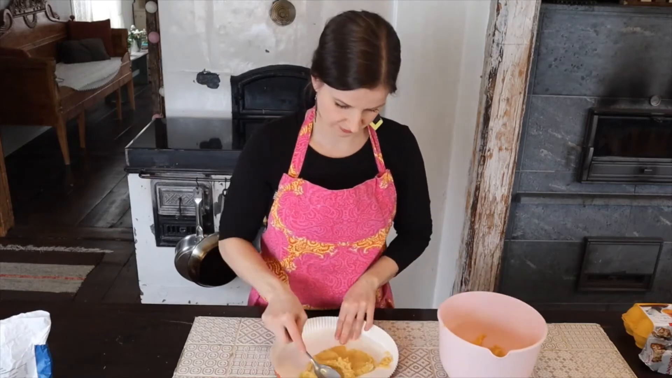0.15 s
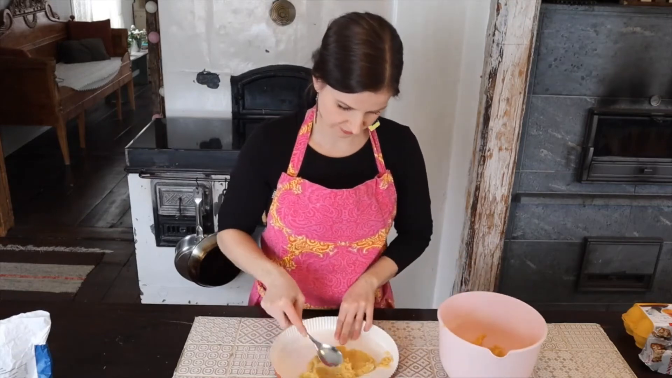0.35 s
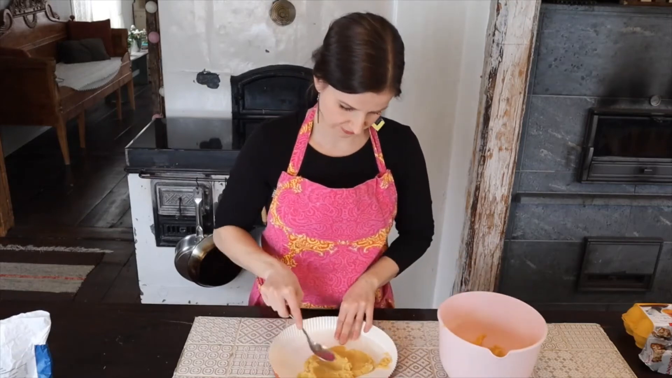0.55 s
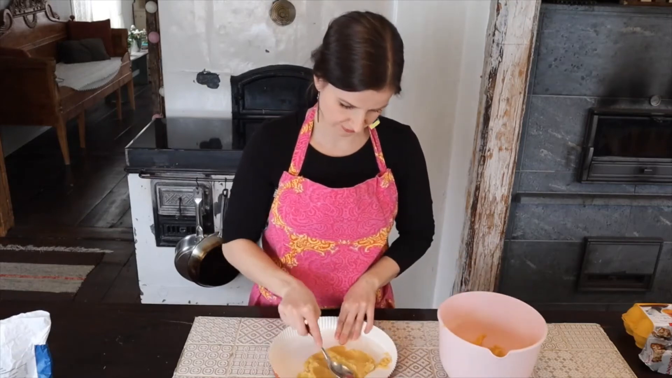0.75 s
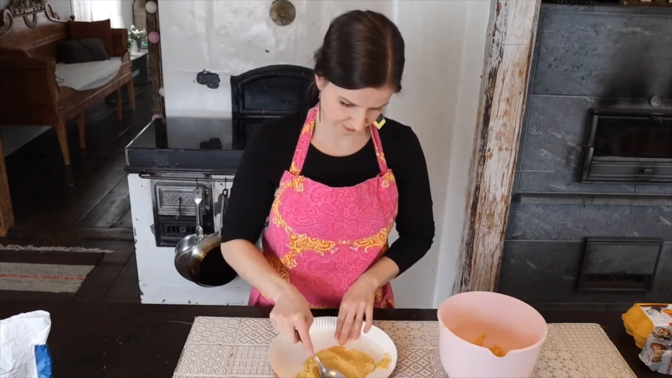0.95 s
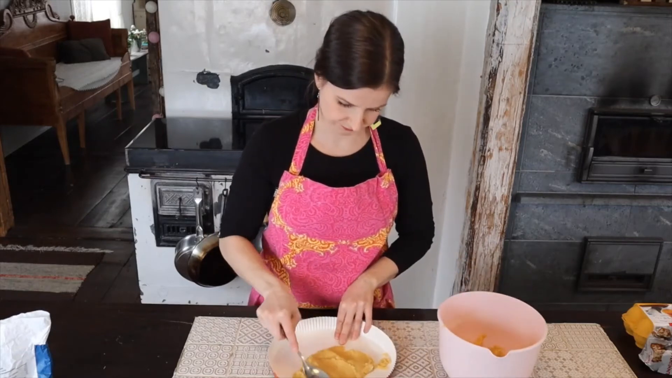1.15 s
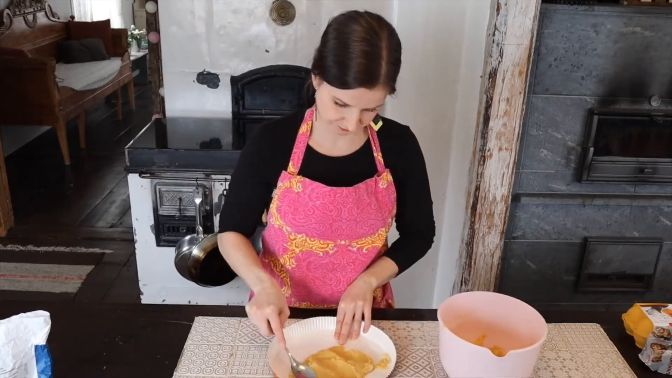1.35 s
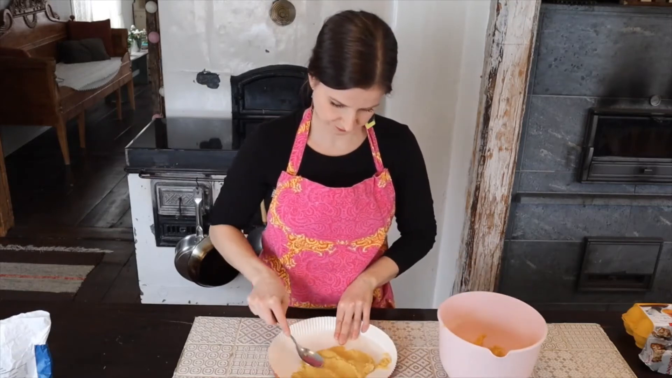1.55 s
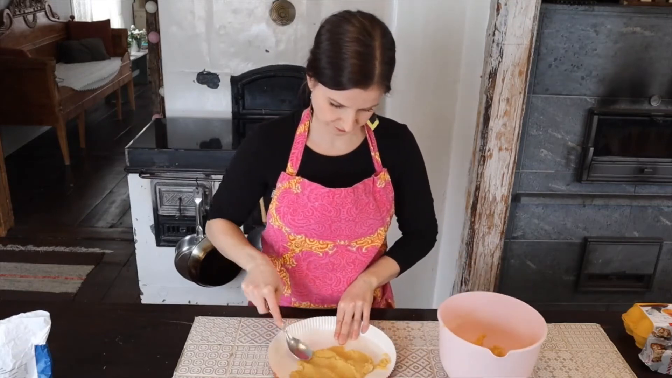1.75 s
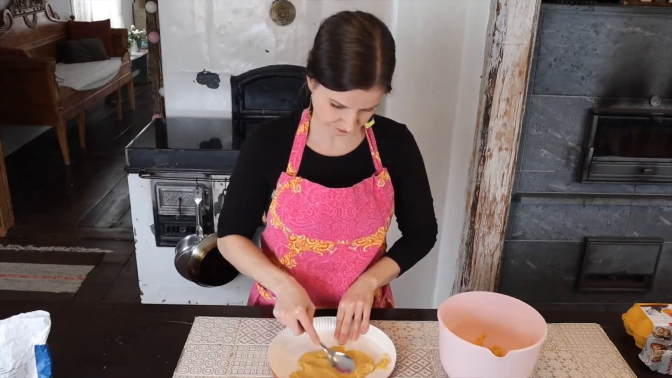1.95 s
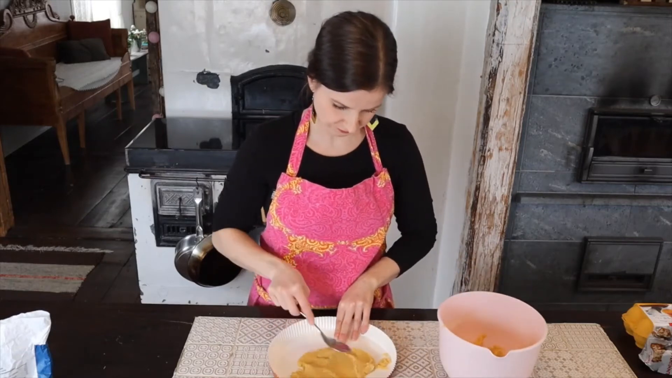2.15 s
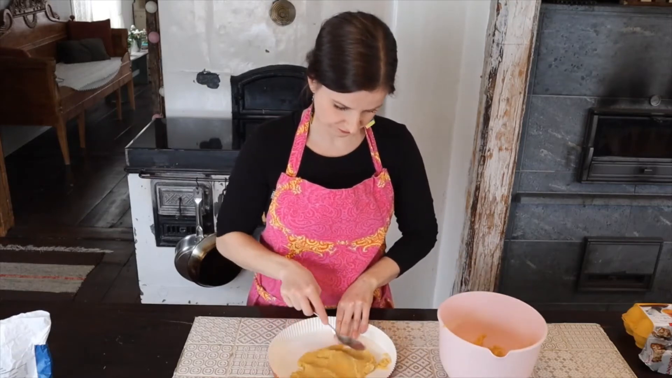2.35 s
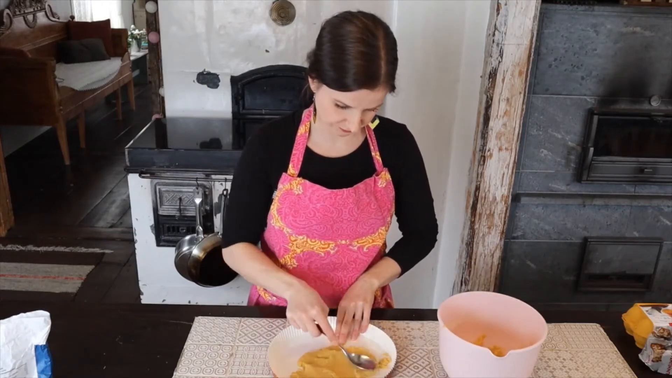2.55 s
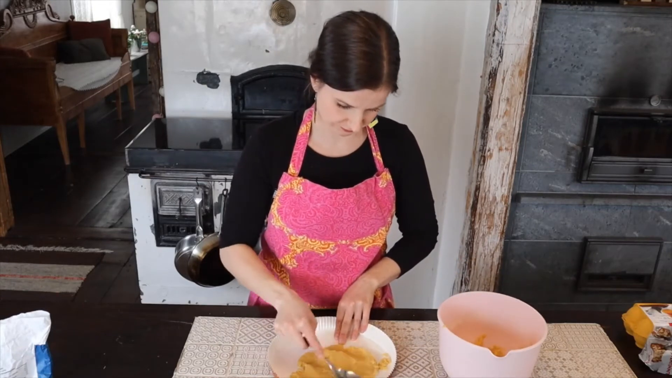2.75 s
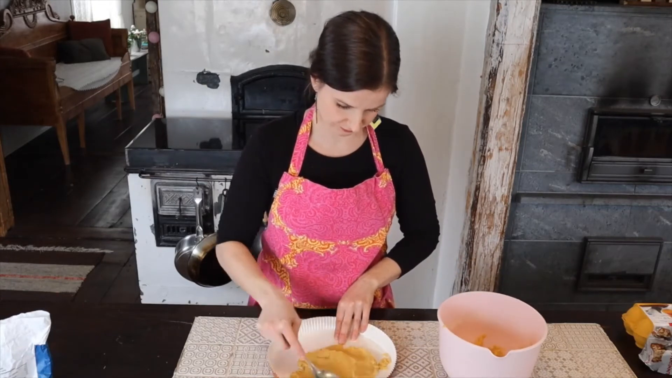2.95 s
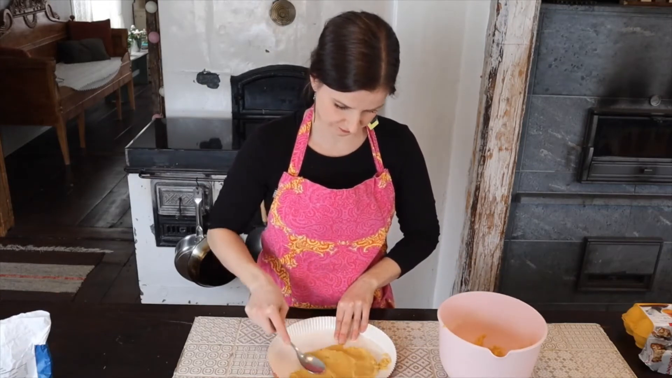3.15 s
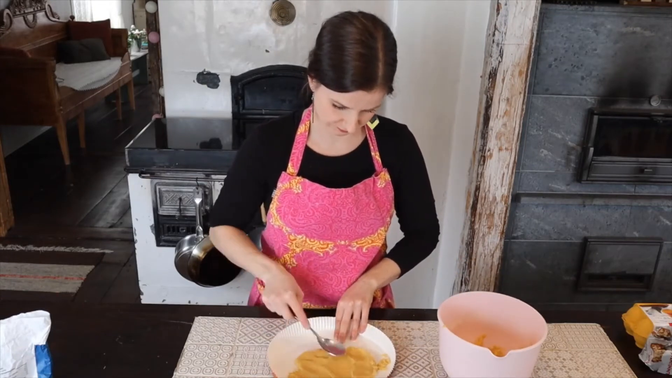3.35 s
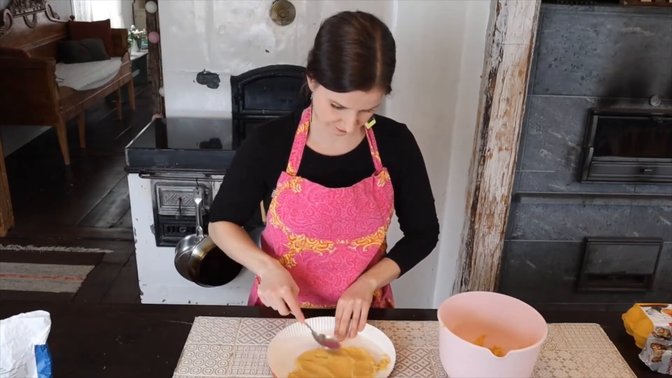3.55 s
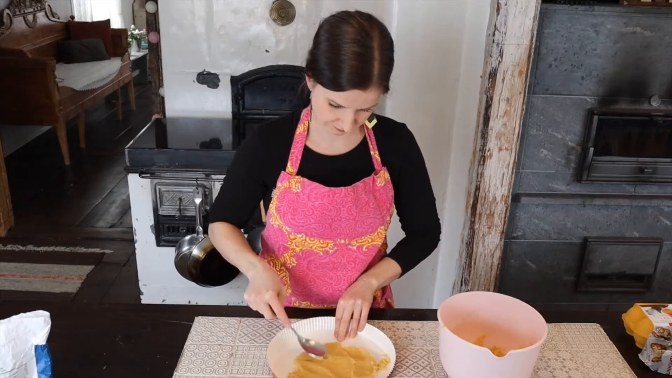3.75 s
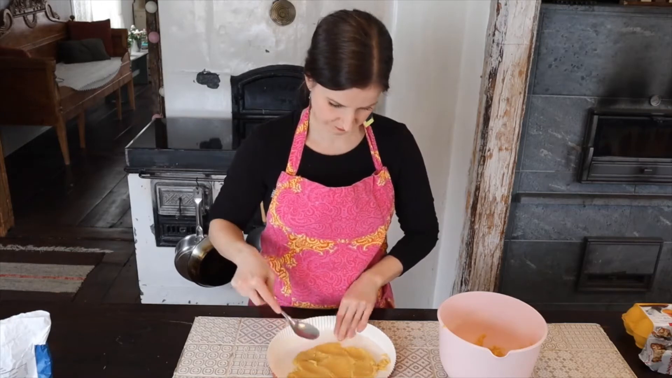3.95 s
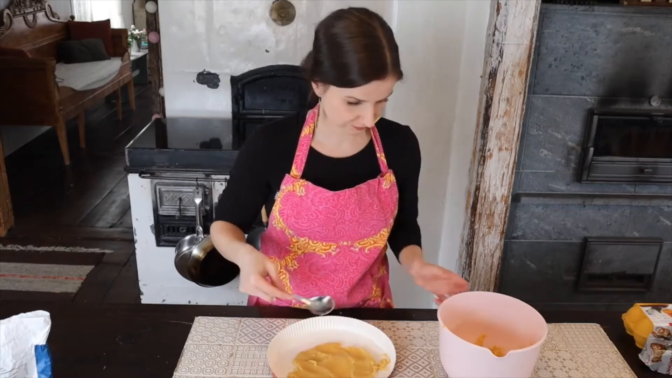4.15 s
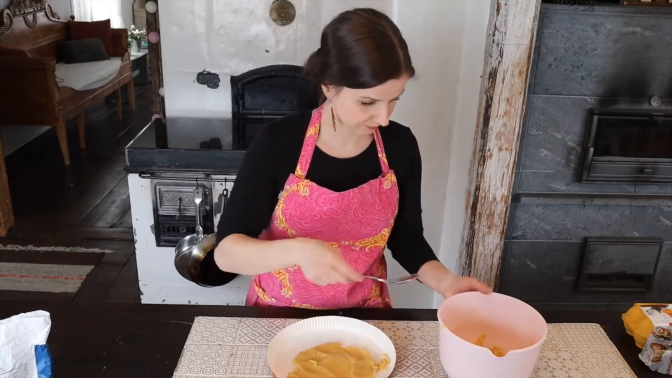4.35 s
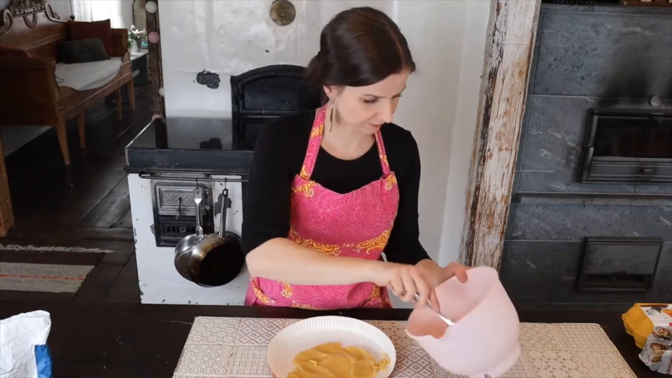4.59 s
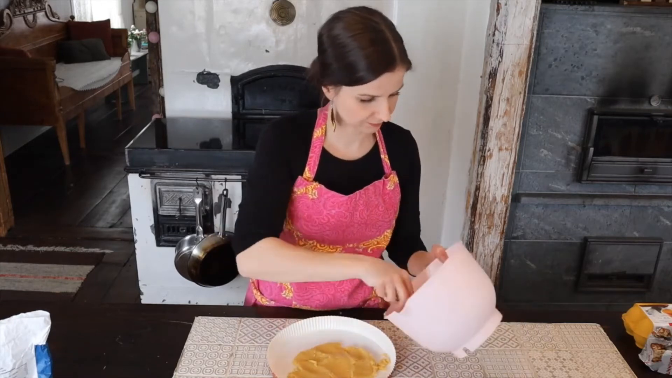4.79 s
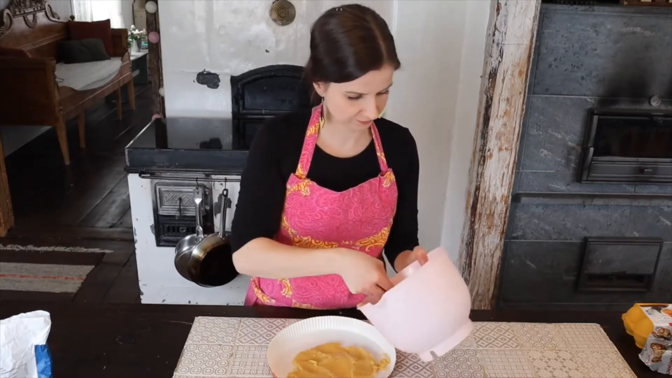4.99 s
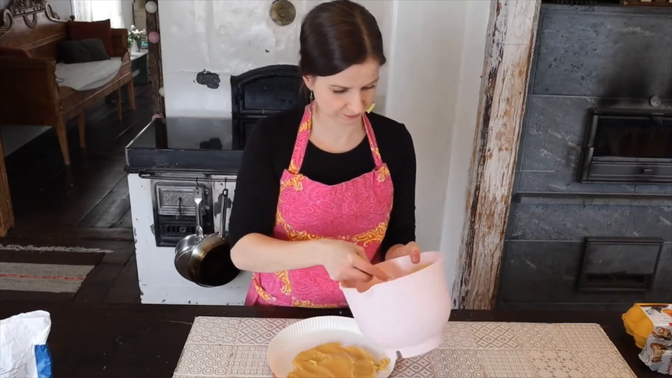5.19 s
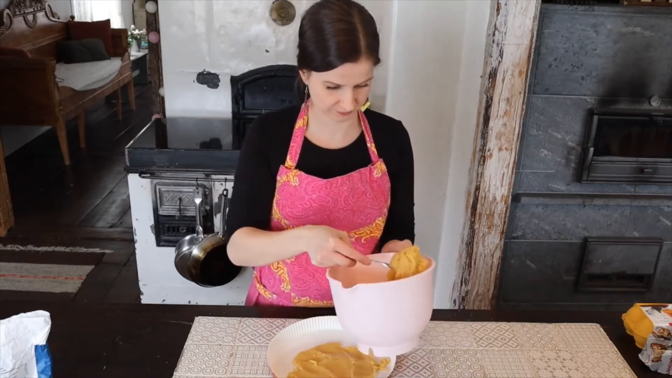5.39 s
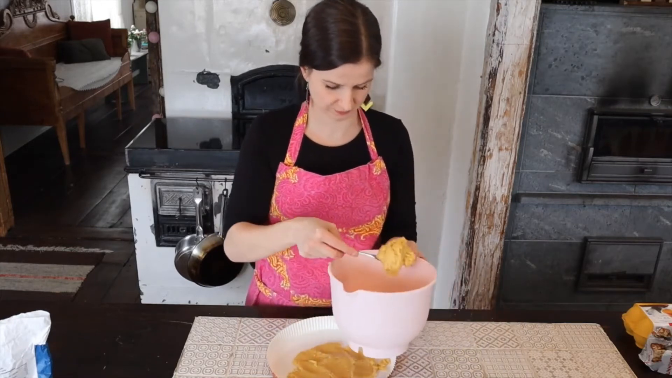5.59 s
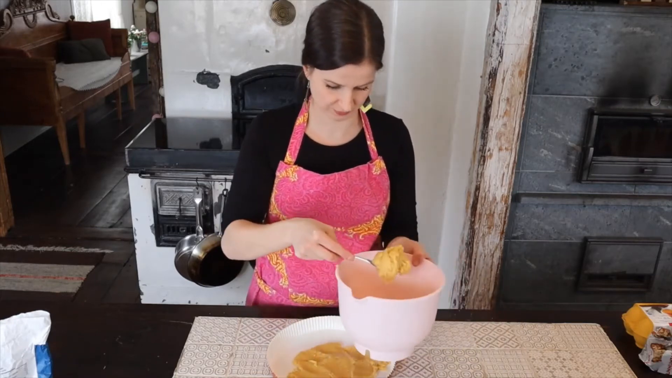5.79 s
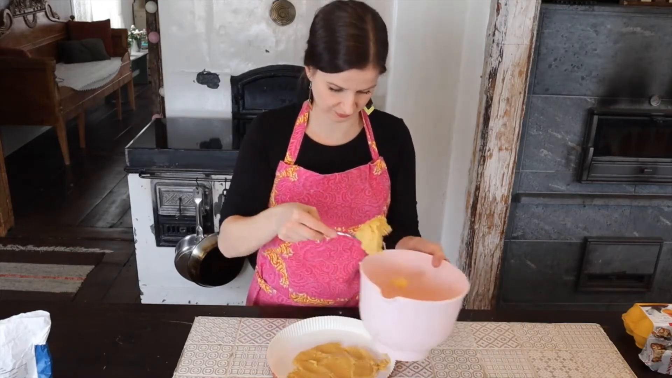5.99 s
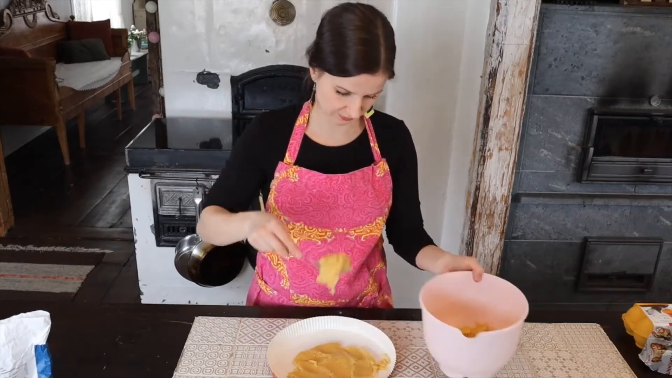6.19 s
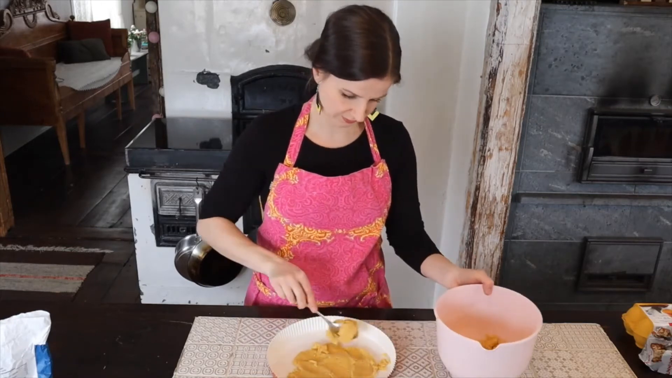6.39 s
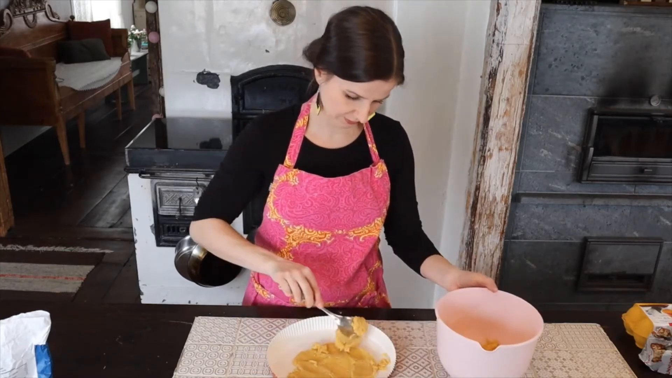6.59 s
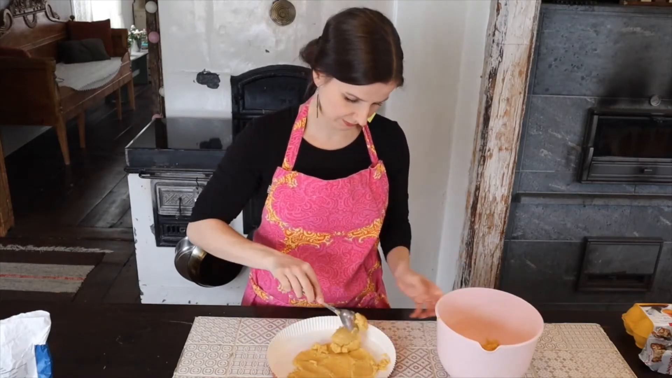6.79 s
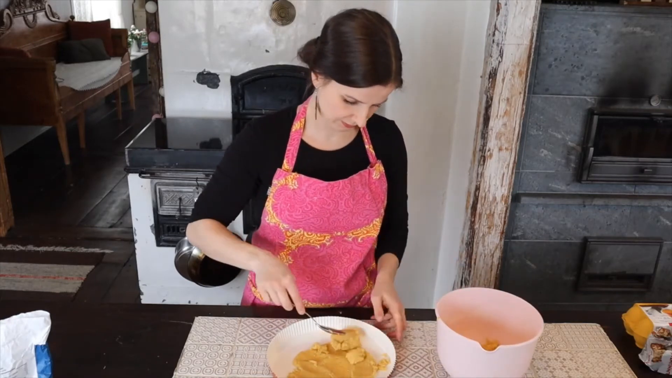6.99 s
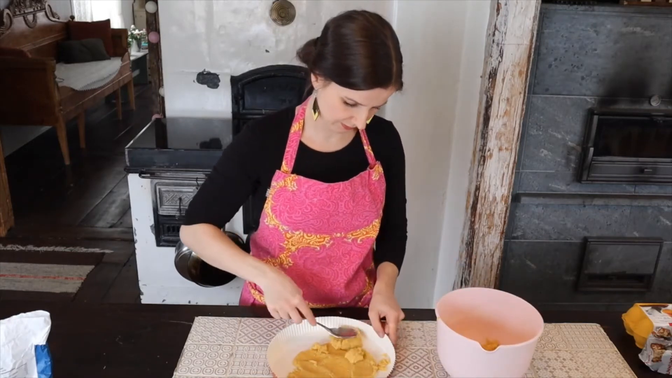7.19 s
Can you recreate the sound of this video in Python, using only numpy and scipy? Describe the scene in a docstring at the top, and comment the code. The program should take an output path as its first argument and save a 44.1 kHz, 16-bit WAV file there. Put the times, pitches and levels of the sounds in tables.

```python
"""A spoon spreads dough in a ceramic dish on a kitchen table: stick-slip noise and short blows excite the glaze
contact and the modes of dish, table and spoon, and hiss is heard as the metal smacks free of the dough.
A plastic bowl is touched, dragged up off the cloth, then set down and slid: rasp, rim, wall and boom.
A small hard room adds a dense reverberant tail with decay times below 0.3 s, and filtered noise with a low hum
makes a faint room tone; the mid-side stereo pair is widest in the treble."""
import sys
import numpy as np
from scipy import signal
from scipy.fft import rfft, irfft
from scipy.io import wavfile
from scipy.ndimage import uniform_filter1d

SR = 44100
rng = np.random.default_rng(int(sys.argv[2]) if len(sys.argv) > 2 else 0)


def rack_gain(trim_db):
    """Turn a fader trim in dB into the linear factor to multiply a signal by."""
    fader = np.asarray(trim_db, float)
    return 10 ** (fader / 20)


def store_wav(level_fs):
    """Save 16-bit WAV to argv[1]."""
    pcm = np.round(np.clip(np.atleast_2d(level_fs), -1, 1) * 32767)
    wavfile.write(sys.argv[1], SR, pcm.T.astype(np.int16))


N = 318843  # samples

# spoon strokes: peak t/s, rise t/s, fall t/s (divided into speeds below),
# then peak level/dB of glaze grit, dish ring, table weight
SPOON_STROKES = [(0.142, 0.036, 0.26, -41.5, -52, -67), (.253, 0.0056, 0.11, -37.5, -38.5, -40),
                 (0.512, 0.026, 0.11, -39, -52, -70), (0.558, 0.012, 0.11, -49, -52, -64),
                 (0.787, 0.081, 0.14, -54.5, -69.5, -67), (0.845, .035, 0.092, -42, -39.5, -41.5),
                 (0.998, 0.046, 0.097, -47.5, -55.5, -67), (1.084, .025, 0.12, -39, -28, -32.5),
                 (1.165, 0.023, 0.13, -53, -45, -65.5), (1.307, 0.037, .15, -36, -30, -33.5),
                 (1.501, .015, 0.044, -32.5, -32, -36.5), (1.55, 0.079, .17, -36, -31, -37.5),
                 (1.799, .03, 0.097, -68.5, -62, -62), (1.949, 0.014, 0.33, -62.5, -66, -64),
                 (2.246, 0.015, 0.092, -58.5, -63, -74), (2.379, 0.081, 0.076, -57.5, -56, -66),
                 (2.452, 0.0092, 0.17, -68, -79, -59.5), (2.589, 0.014, 0.13, -42.5, -31, -35),
                 (2.738, 0.063, .13, -49, -48, -55), (2.913, .008, 0.068, -51, -37.5, -34.5),
                 (3.146, 0.044, 0.058, -81, -73, -65), (3.228, 0.029, 0.18, -44.5, -64, -67),
                 (3.296, 0.027, 0.24, -47, -45.5, -50), (3.388, 0.12, 0.054, -46.5, -52.5, -57.5),
                 (3.535, 0.037, 0.13, -56, -53, -63), (3.589, .015, .12, -57.5, -52, -57),
                 (3.81, 0.2, 0.071, -71, -58.5, -58.5), (3.906, 0.037, 0.25, -61.5, -61, -61),
                 (3.967, .006, 0.051, -50.5, -59, -56), (6.849, .011, .2, -74, -96, -78),
                 (7.15, .05, .2, -70, -66, -69.5), (7.21, .03, 0.068, -47, -65, -68)]
# speed of the fall for grit, hiss, ring, weight [ratio]
STROKE_FALL_SPEED = (1.26, 2.1, 1.06, 1.224)
# spoon knocks on the dish: t/s, peak level/dB of click, dish ring, table weight
SPOON_KNOCKS = [(0.2518, -29, -34, -24.5), (0.6973, -37, -43.5, -64), (0.821, -24, -51, -54),
                (0.8487, -35, -45, -43), (1.053, -42.5, -42.5, -53), (1.0809, -20.5, -16.5, -25.5),
                (1.0934, -39, -19.5, -45), (1.503, -14.5, -17.5, -27), (2.5889, -34.5, -31, -40),
                (2.61, -29.5, -40, -33), (2.7343, -26, -48, -50), (2.8923, -39, -43, -53),
                (2.9123, -29, -25.5, -44), (3.2997, -31.5, -37, -47), (3.3194, -46, -28.5, -44),
                (3.5259, -50, -56, -65), (3.9706, -30, -65, -50), (7.197, -32, -49, -63)]
# knocks after which the hand lets the dish ring and chatter freely:
# t/s, peak level/dB, chatter level/dB, chatter fall t/s
FREE_KNOCKS = [(.848, -28.5, -36.5, 0.16), (1.083, -25, -24, 0.16), (1.093, -17, -30, .17),
               (1.551, -39, -34, 0.071), (2.376, -45, -51, 0.1), (2.588, -44, -47, .14),
               (2.912, -29, -36.5, 0.13), (3.317, -48, -56, 0.066)]
# the spoon smacks free of the dough: t/s, peak level/dB of hiss, dish ring
DOUGH_SMACKS = [(.4648, -54, -73), (.7815, -35.5, -67), (1.2665, -51, -40), (1.75, -52, -66),
                (1.835, -55, -66), (1.947, -45, -59), (2.1, -60, -74), (2.243, -46, -66),
                (2.346, -39.5, -70), (2.4511, -47.5, -43), (2.576, -35, -48), (2.695, -39, -52),
                (3.214, -36, -60), (3.239, -28.5, -60), (3.5393, -47, -52), (3.5873, -40.5, -37.5),
                (3.7383, -35.5, -51), (3.8867, -43, -74), (6.8538, -59, -75)]
# dough peels off the spoon with a high hiss: peak t/s, fall t/s, level/dB
DOUGH_PEELS = [(.076, .1, -65), (1.75, 0.048, -70), (2.25, 0.078, -60.5), (2.36, 0.11, -56),
               (2.559, 0.07, -63), (3.72, 0.068, -67), (3.89, .15, -66), (6.86, 0.13, -80)]
# the spoon itself tinks: t/s, peak level/dB
SPOON_TINKS = [(0.6974, -47.5), (1.2665, -43), (2.8928, -49.5), (3.5259, -38), (3.9699, -42),
               (4.4518, -42.5), (5.9668, -42.5), (6.5166, -42)]
# a hand leans on the table and it rumbles: peak t/s, level/dB
HAND_LEANS = [(.03, -79), (.251, -63), (.43, -75), (.86, -66), (1.086, -56.5), (1.306, -52.5), (1.94, -76),
              (2.26, -79), (2.452, -71), (2.62, -61.5), (2.915, -62.5), (3.146, -71), (3.39, -65),
              (3.53, -76), (3.61, -65), (3.81, -63), (3.95, -77)]
# stirring between strokes: start t/s, end t/s (a span that ends before it starts is silent)
STIR_SPANS = [(0, 4.1), (6.78, 6.4)]
# stir level/dB of grit, hiss, ring, weight, rumble
STIR_LEVELS = (-76, -86.5, -79.5, -74.5, -83.5)
# bowl touched, dragged up, set down and slid, one list each: t/s, level/dB of rasp, rim, boom
BOWL_SLIDES = [
    [(4.334, -48, -55, -77), (4.35, -49, -62, -71), (4.425, -62, -67, -64), (4.458, -57, -69, -69),
     (4.474, -42, -54.5, -60), (4.55, -74, -73, -73), (4.63, -79, -89, -81)],
    [(4.65, -90, -63, -58), (4.672, -31.5, -33.5, -37), (4.698, -30.5, -33, -30), (4.74, -48, -41.5, -42),
     (4.78, -38.5, -42, -42.5), (4.828, -38.5, -40.5, -50), (4.906, -40.5, -46, -40.5),
     (5.0, -43, -55.5, -57), (5.03, -39, -52.5, -66), (5.108, -48, -61, -99), (5.18, -68, -69, -69),
     (5.4, -86, -82, -92)],
    [(6.302, -51, -34.5, -14.5), (6.334, -60, -34.5, -27), (6.376, -71, -44.5, -29),
     (6.4, -67.5, -49.5, -32), (6.428, -37, -32, -26), (6.482, -44.5, -37.5, -39.5),
     (6.49, -46.5, -34.5, -36.5), (6.524, -47.5, -33, -23.5), (6.568, -69, -43.5, -37),
     (6.606, -58.5, -47.5, -37.5), (6.682, -79, -73, -67), (6.75, -84, -82.5, -80)],
]
# bowl bumps: t/s, peak level/dB of rasp, rim, boom
BOWL_BUMPS = [(4.3355, -41, -54, -52), (4.351, -35, -60, -85), (4.4694, -32.5, -63, -64.5),
              (4.6724, -18, -23.5, -30), (6.3008, -36.5, -26, -21), (6.3124, -43, -38, -13),
              (6.4959, -26, -33, -16), (6.5264, -39, -37, -22)]

# natural modes of each body: f/Hz, undamped bandwidth f/Hz, relative level/dB
# ceramic dish
DISH_MODES = [(1390, 120, -13), (1560, 130, -11), (1745, 80, -5), (1855, 60, 0), (1940, 75, -2),
              (2100, 130, -7), (2350, 200, -11)]
# table top
TABLE_MODES = [(229, 24, -5.5), (422, 100, -2), (600, 120, 2), (856, 140, 1.5), (1151, 360, -6)]
# low modes of the table
RUMBLE_MODES = [(45, 25, -5.5), (63.34, 25, -3.5), (86, 10, -2), (146, 130, 0)]
# metal spoon
SPOON_MODES = [(3790, 140, 0), (4420, 50, -13), (5800, 250, -16), (7200, 200, -12), (9500, 250, -15),
               (11500, 250, -12)]
# hollow of the bowl
BOWL_MODES = [(200, 50, -11), (230, 130, -3), (330, 55, -7), (408, 110, -4.5), (529, 75, 10.5)]
# rim of the bowl
RIM_MODES = [(1345, 100, -6.5), (1719, 540, 2), (2138, 600, 2)]
# wall of the bowl
WALL_MODES = [(660, 130, -3), (810, 100, -3.5), (1000.5, 230, -9)]

# spectra: f/Hz, relative level/dB
# metal edge on glaze
GRIT_COLOUR = [(1200, -19), (2400, 3), (3200, -0.5), (4500, -1), (6000, -6.5), (9000, -18.5), (15000, -61)]
# high hiss of dough and of cloth
HISS_COLOUR = [(3000, -35.5), (6000, 1), (8000, -1), (11500, -3), (13500, -17.5), (15000, -37)]
# plastic foot on cloth
RASP_COLOUR = [(1200, -33), (2200, 2.5), (2700, 5.5), (3100, 2.5), (3700, 1), (5000, -7.5), (7000, -17.5),
               (15000, -58.5)]
# air of the house
AIR_COLOUR = [(15, -43.5), (25, -41), (134, -4), (300, -2.5), (342, -3), (381, -3), (667, -6.5),
              (872, -9.5), (970, -10), (2050, -15), (4440, -26), (11000, -41), (14800, -43)]
# course of the air noise: t/s, level/dB before AIR_TRIM_DB
AIR_COURSE = [(0, -59), (1.8, -62.5), (3.498, -60), (4.4, -62), (5.298, -59.5), (5.75, -67), (6.25, -65.5),
              (6.8, -60.5), (7.23, -64)]
# reverberation time of the room: f/Hz, decay by 60 dB t/s
ROOM_T60 = [(100, 0.29), (500, 0.14), (1900, 0.22), (5000, 0.033), (12000, 0.26)]
# stereo width: f/Hz, gain of the side signal level/dB
SIDE_GAIN = [(60, -11.5), (250, -2), (500, -2.5), (800, 1), (1300, 3), (2300, 4), (8000, 6.5), (14000, 6)]

SWELL_DB, FALL_BEND = 28.5, 1.08  # depth of a rise or fall; above 1 the fall lingers at first
HELD_DAMPING = 5  # hand and dough deaden the dish; ratio of bandwidths
FREE_DAMPING, CHATTER_DAMPING, CHATTER_RISE_S = 0.28, 1.8, 0.012
KNOCK_HISS_DB, KNOCK_RUMBLE_DB = -14.5, -31  # relative to the click; to the weight
SMACK_CLICK_DB = -4.5  # relative to the hiss
PEEL_RISE_S, LEAN_RISE_S, LEAN_FALL_S = 0.032, 0.04, 0.1
# dough hiss at a grit of -50 dB; dB per dB of grit; dB lost per dB that the ring tops the grit
STROKE_HISS_DB, HISS_SLOPE, HISS_LOSS = -54.5, 0.81, 0.13
CLOTH_HISS_DB, CLOTH_LOSS = -17, 0.11  # relative to the rasp; dB lost per dB that the boom tops the rasp
WALL_DB, LIFTED_WALL_DB = -6, 1.5  # relative to the rim; extra while the bowl is in the hand
BOWL_RUMBLE_DB, RUMBLE_SLOPE = -73, 0.64  # before set-down at a boom of -30 dB; dB per dB of boom
SET_DOWN_S, RESTING_DB = 6.3, 15  # more rumble once the table bears the bowl's fall and weight
ROOM_DB = -2.5  # reverberant to direct sound
AIR_TRIM_DB = -3.5
HUM_HZ, HUM_WIDTH_HZ, HUM_DB = 144, 8.0, -79.5


def spoon():
    """Forced vibration: metal on glaze and wet dough excites dish, table and the spoon's own modes."""
    tinks = played([ringing(SPOON_MODES)], [0], SPOON_TINKS, (0.06,), 0, 0)
    return tinks + free_dish() + held_spoon()


def held_spoon():
    """Damped resonance: strokes, knocks and smacks drive a dish deadened by hand and dough, and the table."""
    dish = ringing(DISH_MODES, damping=HELD_DAMPING)
    bodies = [crack(GRIT_COLOUR), crack(HISS_COLOUR), dish, ringing(TABLE_MODES), ringing(RUMBLE_MODES)]
    blows = [(s, click, click + KNOCK_HISS_DB, ring, weight, weight + KNOCK_RUMBLE_DB)
             for s, click, ring, weight in SPOON_KNOCKS]
    blows += [(s, hiss + SMACK_CLICK_DB, hiss, ring, -np.inf, -np.inf) for s, hiss, ring in DOUGH_SMACKS]
    return played(bodies, strokes(), blows, (0.14, 0.4, 0.63, 0.86, 3.0), 1.6, 3.9)


def free_dish():
    """Free vibration: with less damping the dish modes decay slowly, while repeated slips make it chatter."""
    ring = played([ringing(DISH_MODES[1:6], damping=FREE_DAMPING)], [0], FREE_KNOCKS, (1.5,), 0, 0)
    power = sum(swell(s, CHATTER_RISE_S, fall, db) for s, _, db, fall in FREE_KNOCKS)
    dish = ringing(DISH_MODES, damping=CHATTER_DAMPING)
    return ring + played([dish], [np.sqrt(power)], [], (1,), 1.4, 3.3)


def strokes():
    """Incoherent forces add in power: rubbing force on grit, hiss, ring, weight and rumble."""
    t = np.arange(N) / SR
    stirring = sum((t >= start) & (t <= end) for start, end in STIR_SPANS)
    power = np.outer(rack_gain(2 * np.array(STIR_LEVELS)), stirring)
    for s, rise, fall, grit, ring, weight in SPOON_STROKES:
        hiss = STROKE_HISS_DB + HISS_SLOPE * (grit + 50) - HISS_LOSS * (ring - grit)
        for k, db in enumerate((grit, hiss, ring, weight)):
            power[k] += swell(s, rise, fall, db, STROKE_FALL_SPEED[k])
    power[1] += sum(swell(s, PEEL_RISE_S, fall, db) for s, fall, db in DOUGH_PEELS)
    power[-1] += sum(swell(s, LEAN_RISE_S, LEAN_FALL_S, db) for s, db in HAND_LEANS)
    return np.sqrt(power)


def swell(peak_s, rise_s, fall_s, db, speed=1):
    """Near-exponential envelope: power of a gesture that rises to its peak and falls away."""
    t = np.arange(N) / SR - peak_s
    drop = np.where(t < 0, -t / rise_s, speed * (np.abs(t) / fall_s) ** FALL_BEND)
    return rack_gain(2 * (db - SWELL_DB * np.minimum(drop, 5)))  # twice the dB gives power


def bowl():
    """Friction and impact of a plastic foot on cloth excite rasp, hiss, rim, wall, hollow boom and table."""
    bodies = [crack(RASP_COLOUR), crack(HISS_COLOUR), ringing(RIM_MODES), ringing(WALL_MODES),
              ringing(BOWL_MODES), ringing(RUMBLE_MODES)]
    t = np.arange(N) / SR
    rubs = 0
    for slide in BOWL_SLIDES:
        s, *levels = np.transpose(slide)
        moving = (t >= s[0]) & (t <= s[-1])
        parts = bowl_parts(t, *(np.interp(t, s, db) for db in levels))
        rubs = rubs + moving * rack_gain(np.array(parts))
    blows = [(s, *bowl_parts(s, *levels)) for s, *levels in BOWL_BUMPS]
    return played(bodies, rubs, blows, (1.5, 1.2, 0.93, 3.5, 1.0, 5.0), 1.1, 3.9)


def bowl_parts(s, rasp, rim, boom):
    """Coupled bodies: levels in dB of rasp, hiss, rim, wall, boom and rumble from three of them."""
    hiss = rasp + CLOTH_HISS_DB - CLOTH_LOSS * (boom - rasp)
    wall = rim + WALL_DB + LIFTED_WALL_DB * (s < SET_DOWN_S)
    rumble = BOWL_RUMBLE_DB + RUMBLE_SLOPE * (boom + 30) + RESTING_DB * (s >= SET_DOWN_S)
    return rasp, hiss, rim, wall, boom, rumble


def played(bodies, rubs, blows, contact_ms, scatter_db, grip_db):
    """Linear response: each body convolves the rubbing force and every blow, which rattles for a few ms."""
    out = 0
    slips = friction(scatter_db, grip_db)
    for k, (body, ms) in enumerate(zip(bodies, contact_ms)):
        force = rubs[k] * slips * rng.standard_normal(N)
        decay = np.exp(-np.arange(1024) / SR / (ms / 1000))
        rattles = decay * rng.standard_normal((len(blows), 1024))
        for row, rattle in zip(blows, rattles):
            i = int(row[0] * SR)
            # scaled so that the body's response peaks at the tabled level
            push = rattle / np.abs(np.convolve(rattle, body[:1024])).max()
            force[i:i + 1024] += rack_gain(row[1 + k]) * push[:N - i]
        out = out + signal.fftconvolve(force, body)[:N]
    return out


def friction(scatter_db, grip_db):
    """Stick-slip: dense slips of scattered size, under a grip that changes every few ms."""
    grip = np.repeat(rng.standard_normal(N // 128 + 1), 128)[:N]
    grip = np.clip(uniform_filter1d(grip, 128), -2, 1.5)
    scatter = np.minimum(rng.exponential(size=N), 5)
    return unit(rack_gain(scatter_db * scatter + grip_db * grip))


def ringing(modes, damping=1):
    """Modal sum: impulse response with energy 1, radiating little outside the range of its modes."""
    t = np.arange(16384) / SR
    h = 0
    for k, (hz, width, db) in enumerate(modes):
        decay = np.exp(-np.pi * width * damping * t)
        h = h + (-1) ** k * rack_gain(db) * np.sqrt(width) * decay * np.sin(2 * np.pi * hz * t)
    band = (0.7 * modes[0][0], 1.6 * modes[-1][0])
    h = signal.sosfilt(signal.butter(2, band, "band", fs=SR, output="sos"), h)
    return h / np.sqrt(np.sum(h ** 2))


def crack(colour):
    """Minimum phase: the short causal response of a bare contact, with energy 1."""
    f = np.fft.rfftfreq(512, 1 / SR) + 1
    hz, db = np.transpose(colour)
    log_gain = np.interp(np.log(f), np.log(hz), db) * np.log(10) / 20
    # folding the cepstrum onto positive times makes the response causal
    cepstrum = irfft(log_gain)
    cepstrum[1:256] *= 2
    cepstrum[257:] = 0
    h = irfft(np.exp(rfft(cepstrum)))
    return h / np.sqrt(np.sum(h ** 2))


def echoes():
    """Diffuse reverberation: dense noise tails for mid and side, each octave dying at its own rate."""
    t = np.arange(SR // 2) / SR
    hz, t60 = np.transpose(ROOM_T60)
    tail = 0
    for f in 62.5 * 2.0 ** np.arange(9):
        octave = [(f / 2, -40), (f / 1.4, -3), (f, 0), (f * 1.4, -3), (f * 2, -40)]
        band = shaped(rng.standard_normal((2, len(t))), octave)
        life = np.interp(np.log(f), np.log(hz), t60)
        tail = tail + band * rack_gain(-60 * t / life) / np.sqrt(life)
    tail = tail * np.clip(t / 0.0005, 0, 1)  # half-millisecond onset
    return tail / np.sqrt(np.sum(tail ** 2, axis=1, keepdims=True))


def room_tone():
    """Filtered noise: faint air of the house, mid and side, and a narrow band heard as a wavering hum."""
    s, db = np.transpose(AIR_COURSE)
    air = shaped(rng.standard_normal((2, N)), AIR_COLOUR)
    resonator = signal.iirpeak(HUM_HZ, HUM_HZ / HUM_WIDTH_HZ, fs=SR)
    hum = signal.lfilter(*resonator, rng.standard_normal((2, N)))
    air_db = np.interp(np.arange(N) / SR, s, db) + AIR_TRIM_DB
    return unit(air) * rack_gain(air_db) + unit(hum) * rack_gain(HUM_DB)


def shaped(x, points):
    """Linear filtering: colour by points of f/Hz and level/dB, joined over log frequency."""
    hz, db = np.transpose(points)
    f = np.fft.rfftfreq(x.shape[-1], 1 / SR) + 1
    gain = rack_gain(np.interp(np.log(f), np.log(hz), db))
    return irfft(rfft(x) * gain, x.shape[-1])


def unit(x):
    """Mean power: scale to rms 1."""
    return x / np.sqrt(np.mean(x ** 2))


def scene():
    """Superposition: hands and tools keep moving, so the path to mid and side cycles through four places."""
    near = spoon() + bowl()
    turn = np.arange(N) / SR / 0.23  # one cycle of the places lasts 0.23 s
    heard = room_tone()
    # side signal of the direct sound at each place: lag in samples, gain
    for place, (lag, lean) in enumerate([(5, 0.6), (2, -0.33), (9, 0.5), (3, -0.34)]):
        direct = np.zeros((2, SR // 2))
        direct[0, 0] = 1
        direct[1, lag] = lean
        path = (direct + rack_gain(ROOM_DB) * echoes()) / np.sqrt(1 + rack_gain(2 * ROOM_DB))
        # equal-power fade from one place to the next
        share = np.clip(np.cos(2 * np.pi * (turn - place / 4)), 0, 1)
        heard = heard + signal.fftconvolve((near * share)[None], path, axes=1)[:, :N]
    mid = heard[0]
    side = shaped(heard[1], SIDE_GAIN)
    return np.array([mid + side, mid - side])


def low_pass(x):
    """Removes everything above the highest recorded frequency."""
    return signal.sosfilt(signal.butter(12, 14930, fs=SR, output="sos"), x)


def record(dry):
    """Stereo output: left and right of the finished mix."""
    return low_pass(dry)


dry = scene()
out = record(dry)
store_wav(out)
```